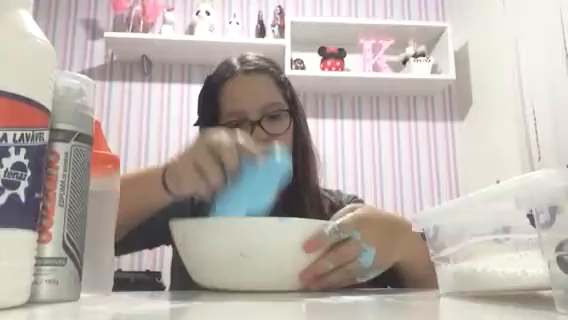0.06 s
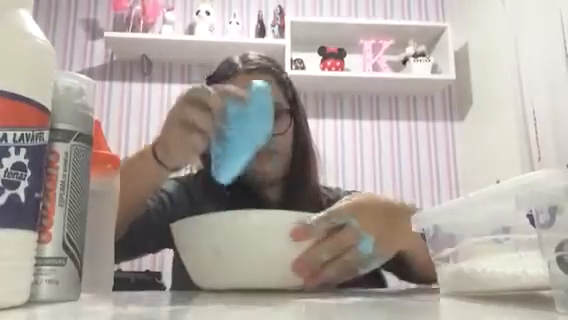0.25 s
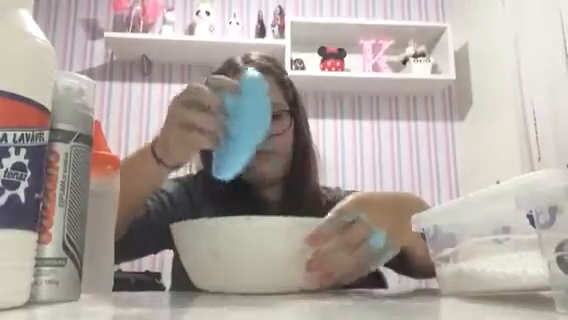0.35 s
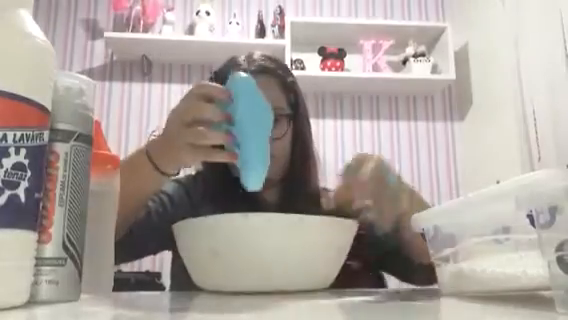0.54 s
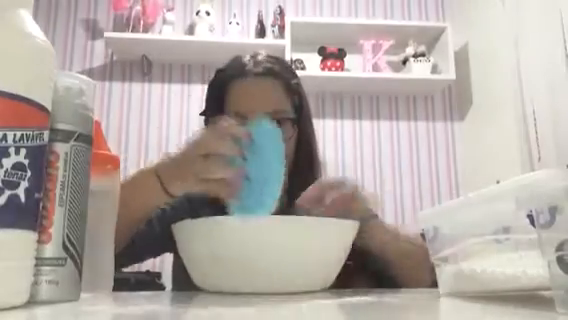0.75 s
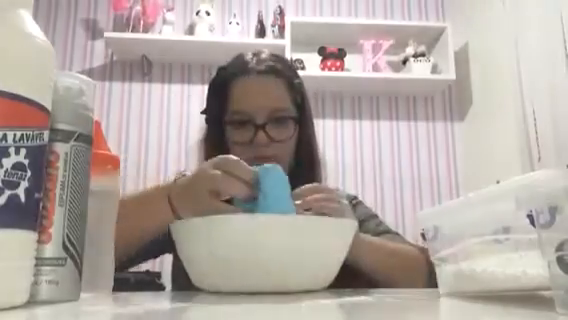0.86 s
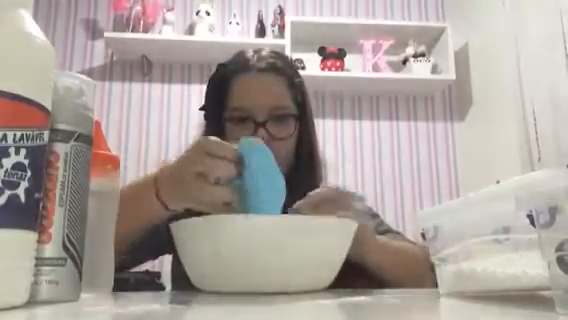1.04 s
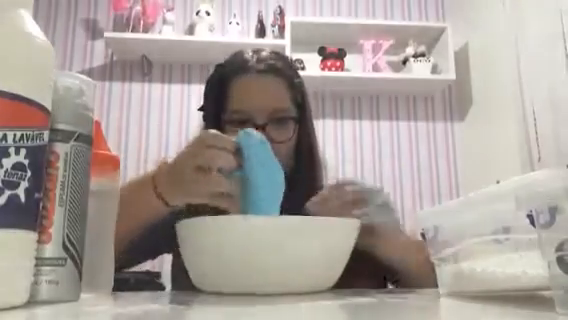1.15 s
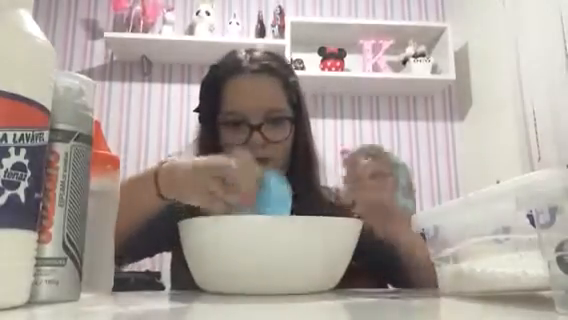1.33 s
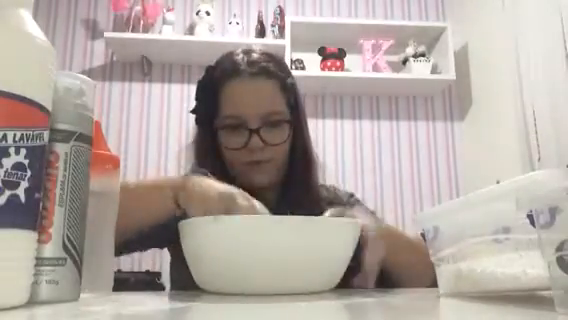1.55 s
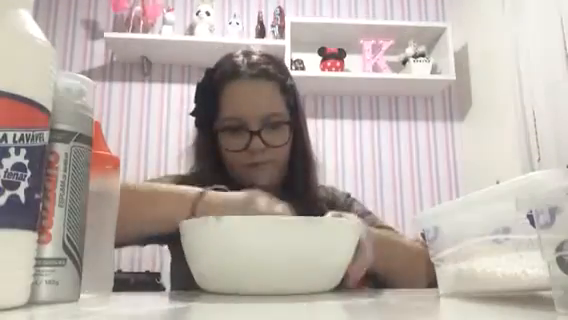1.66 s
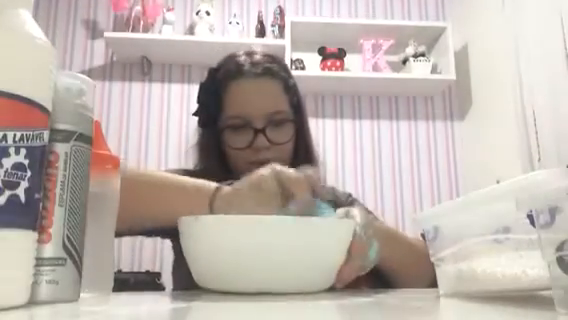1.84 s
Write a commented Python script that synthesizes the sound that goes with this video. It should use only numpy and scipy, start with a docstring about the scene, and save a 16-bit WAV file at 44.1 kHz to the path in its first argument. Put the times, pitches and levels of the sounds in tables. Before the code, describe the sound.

Sticky slime smacks and pops dully as hands pull it from a plastic bowl indoors

```python
"""Dull wet smacks, short hollow pops and low thumps: sticky slime pulled from a plastic bowl and pressed back.
Each smack is a filtered click with a burst of snaps; pops and thumps are short decaying sines.
The click also rings bowl and table modes; rubbing, a squelch and deep table bumps join in a small room.
Underneath: shaped room noise, hiss pulsing at the mains rate and a thin whine gated once a cycle."""
import sys
import numpy as np
from scipy import signal
from scipy.fft import rfft, irfft
from scipy.io import wavfile
from scipy.ndimage import uniform_filter1d

SR = 44100
rng = np.random.default_rng(int(sys.argv[2]) if len(sys.argv) > 2 else 0)


def persist_wave(psi):
    """Save psi, clipped to +-1, as 16-bit WAV."""
    counts = np.round(np.clip(psi, -1, 1) * 32767).astype(np.int16)
    wavfile.write(sys.argv[1], SR, np.atleast_2d(counts).T)


N = 83790
TIME = np.arange(N) / SR
MAINS_HZ = 60


def amp(db):
    """Decibels to linear gain."""
    return 10 ** (np.asarray(db) / 20)


def unit(x):
    """Scales to rms 1."""
    return x / np.sqrt(np.mean(x ** 2) + 1e-20)


def read(points, hz):
    """Interpolates a frequency table on a log-frequency axis."""
    f, value = np.transpose(points)
    return np.interp(np.log(hz + 1), np.log(f + 1), value)


def add(mix, start_s, sound):
    """Adds a sound into mix, in place, from start_s."""
    part = mix[max(round(start_s * SR), 0):][:len(sound)]
    part += sound[:len(part)]


def colour(x, points, lag_s=0, lag_hz=609, size=8192):
    """Minimum-phase filter; lag_s delays the bass, as bending waves do, fading out with scale lag_hz."""
    hz = abs(np.fft.fftfreq(size, 1 / SR))
    log_gain = np.log(amp(read(points, hz)))
    response = np.exp(np.conj(signal.hilbert(log_gain)))[:size // 2 + 1]
    delay_s = lag_s * np.exp(-hz[:size // 2 + 1] / lag_hz)
    # phase is the integral of group delay over frequency
    phase = 2 * np.pi * (np.cumsum(delay_s) - delay_s[0]) * SR / size
    taps = irfft(response * np.exp(-1j * phase))
    return signal.fftconvolve(x, taps[:size // 2])[:len(x)]


def soft_onset(t, rise_s):
    """Smooth rise from 0 towards 1."""
    return 1 - np.exp(-(t / rise_s) ** 2)


def ring(t, hz, t60_s, rise_s):
    """Damped mode: a sine with a soft onset, then exponential decay."""
    decay = amp(-60 * np.maximum(t - rise_s, 0) / t60_s)
    return soft_onset(t, rise_s) * decay * np.sin(2 * np.pi * hz * t)


def crackle(snaps_per_s=3300, spread_db=3):
    """Dense random snaps of either sign, with exponentially spread levels."""
    size = amp(spread_db * np.minimum(rng.exponential(1, N), 4))
    return size * rng.choice([-1, 1], N) * (rng.random(N) < snaps_per_s / SR)


def room_noise():
    """Steady Gaussian noise shaped in the spectrum."""
    # room noise colour: f/Hz, relative level/dB
    floor_colour = [(20, -12), (45, -2.5), (80, 7.5), (170, 1.5), (330, -2.5), (600, -5), (1040, -7.5),
                    (1600, -12), (2100, -28), (4000, -27), (5500, -28), (8000, -67)]
    hz = np.fft.rfftfreq(N, 1 / SR)
    spectrum = rfft(rng.standard_normal(N)) * amp(read(floor_colour, hz))
    return amp(-64) * unit(irfft(spectrum, N))


def mains_buzz():
    """A decaying spit of hiss every mains cycle, over a weaker steady hiss, wavering in level."""
    # buzz colour: f/Hz, relative level/dB
    buzz_colour = [(2000, -28), (3700, -11), (5000, -25), (6200, -5.5), (7000, 0), (7600, -3.5), (8500, -4),
                   (10000, 5), (11400, -4.5), (12300, -34.5), (13700, -26), (14600, -8), (16000, -11.5)]
    spit_at_s, fade_s, steady_part = 0.0085, 0.0022, 0.2
    waver_db, waver_s = 2.5, 0.0088  # rms depth, smoothing time
    spit = steady_part + np.exp(-((TIME - spit_at_s) % (1 / MAINS_HZ)) / fade_s)
    smoothing = [1, -np.exp(-1 / (waver_s * SR))]
    waver = unit(signal.lfilter([1], smoothing, rng.standard_normal(N)))
    hiss = spit * amp(waver_db * waver) * rng.standard_normal(N)
    return amp(-67.5) * unit(colour(hiss, buzz_colour))


def whine():
    """A high sine broadened by random phase drift and gated off once per mains cycle."""
    tone_hz, width_hz = 15535, 24
    gate_at_s, duty = 0.01, 0.78
    is_on = (TIME - gate_at_s) * MAINS_HZ % 1 < duty
    gate = uniform_filter1d(1. * is_on, size=40)  # softened edges
    drift = np.cumsum(rng.standard_normal(N)) * np.sqrt(2 * np.pi * width_hz / SR)
    return amp(-63.5) * unit(gate * np.sin(2 * np.pi * tone_hz * TIME + drift))


def background():
    """Sum of room noise, mains buzz and whine."""
    return room_noise() + mains_buzz() + whine()


def room(x):
    """Direct sound plus discrete reflections, two standing waves and a diffuse tail."""
    # near reflections: delay/s, gain
    echoes = [(.0045, 0.13), (0.0181, 0.15), (0.0233, -0.056), (.031, .1)]
    # decay of the diffuse tail: f/Hz, t60/s
    tail_t60 = [(60, 0.31), (150, .25), (300, 0.3), (550, 0.14), (1000, 0.24), (2500, 0.36), (6000, 0.25)]
    # tail colour: f/Hz, relative level/dB
    tail_colour = [(60, 10.5), (290, -10), (500, -1), (1000, -2), (2500, -10.5), (5000, -33)]
    # standing waves: f/Hz, approximate gain at resonance/dB, t60/s
    standing_waves = [(140, -0.5, 0.4), (220, -0.5, 0.2)]
    tail_db, onset_s = -6.5, 0.011
    t = np.arange(SR // 2) / SR
    hz, frame_s, bins = signal.stft(rng.standard_normal(len(t)), SR, nperseg=256)
    decay = amp(-60 * frame_s / read(tail_t60, hz)[:, None])
    tail = signal.istft(bins * decay, SR, nperseg=256)[1][:len(t)]
    tail = tail * soft_onset(t, onset_s)
    response = amp(tail_db) * colour(tail / np.linalg.norm(tail), tail_colour)
    for delay_s, gain in echoes:
        add(response, delay_s, np.array([gain]))
    for mode_hz, db, t60_s in standing_waves:
        resonance_scale = 2 * np.log(1000) / (t60_s * SR)  # unit gain at resonance
        response = response + amp(db) * resonance_scale * ring(t, mode_hz, t60_s, onset_s)
    return x + signal.fftconvolve(x, response)[:N]


def bumps():
    """The bowl nudges the table: soft, deep, heavily damped tones."""
    # nudges: t/s, level/dB
    nudges = [(0.034, -58), (0.281, -50), (0.758, -51), (0.942, -41), (1.296, -54)]
    out = np.zeros(N)
    for start_s, db in nudges:
        add(out, start_s, amp(db) * ring(TIME, hz=62, t60_s=0.017, rise_s=0.0038))
    return out


def rubbing():
    """Sticky fingers shift on slime and bowl: coloured crackle under a level curve."""
    # rubbing strength: t/s, level/dB
    strength = [(0, -59.5), (.15, -62.5), (.195, -66), (.218, -27.5), (.24, -43.5), (.335, -57.5),
                (.42, -53.5), (.52, -55), (.6, -77), (.68, -74), (.7, -50.5), (.78, -63), (.93, -59.5),
                (1.1, -65), (1.33, -62), (1.45, -68), (1.64, -69), (1.75, -58.5), (1.9, -61.5)]
    # rubbing colour: f/Hz, relative level/dB
    rub_colour = [(25, -71.5), (70, -7), (220, 9.5), (500, -3), (950, -6), (1400, -19), (2200, -22),
                  (3200, -36), (6000, -36)]
    level_db = np.interp(TIME, *np.transpose(strength))
    return amp(level_db) * unit(colour(crackle(), rub_colour))


def squelch():
    """Air crackles out from under the settling lump: rise, hold, exponential fade."""
    # squelch colour: f/Hz, relative level/dB
    squelch_colour = [(60, -19), (300, 8.5), (600, -0.5), (950, -7), (1250, -17), (1600, -13.5),
                      (2250, -18), (2650, -41), (3800, -34), (5500, -47)]
    start_s, rise_s, hold_s, fade_s = 1.148, 0.026, 0.073, 0.025
    t = TIME - start_s
    fade = np.exp(-np.maximum(t - rise_s - hold_s, 0) / fade_s)
    press = np.clip(t / rise_s, 0, 1) * fade
    return amp(-44.5) * press * unit(colour(crackle(), squelch_colour))


def bowl_ring(blows):
    """Bowl and table modes excited by the smack impulses."""
    # modes: f/Hz, relative level/dB, t60/s
    modes = [(221.4, -10, 0.12), (276.6, -11.5, 0.16), (339, 5, 0.074), (402.7, -1.5, .16),
             (468, -10.5, 0.14), (526.6, 5.5, 0.07), (600, -9, 0.14), (720, -39, 0.05), (892, -15, 0.045),
             (1134, -33.5, 0.054), (1192, -27.5, .08), (1625, -23, 0.087)]
    t = np.arange(SR // 2) / SR
    response = sum(amp(db) * ring(t, hz, t60_s, 1 / hz) for hz, db, t60_s in modes)
    return amp(-18.5) * signal.fftconvolve(blows, response)[:N]


def pop(t, hz, rise_s, length_s):
    """An air pocket sounds for a few cycles before the slime chokes it."""
    return soft_onset(t, rise_s) * np.exp(-(t / length_s) ** 2) * np.sin(2 * np.pi * hz * t)


def cling(t, decay_s=0.0063, snaps_per_s=2100):
    """Tiny random snaps dying away after a smack, scaled to unit energy."""
    is_snap = rng.random(len(t)) < snaps_per_s / SR
    snaps = rng.standard_normal(len(t)) * is_snap * np.exp(-t / decay_s)
    return snaps / (np.linalg.norm(snaps) + 1e-9)


def contacts():
    """Wet contacts: each smacks, clings, pops and thumps; its impulse rings the bowl."""
    # contacts: t/s, relative smack level/dB, relative snaps level/dB, pop level/dB, pop f/Hz,
    # pop rise/s, pop length/s, thump level/dB
    contact_events = [(.039, -49.5, -45.5, -48, 609, .004, 0.0091, -66),
                      (0.2212, 0, -3.5, -8, 254, 0.0028, .011, -23),
                      (0.299, -26.5, -30.5, -37, 232, 0.0023, .01, -41),
                      (0.363, -35.5, -33, -50, 294, 0.0036, 0.0085, -65),
                      (.438, -30, -38.5, -30.5, 268, 0.0017, 0.0099, -36.5),
                      (.471, -32, -29, -29.5, 316, 0.003, 0.014, -31),
                      (0.7, -13.5, -15, -16.5, 257.4, 0.0044, 0.0099, -59),
                      (0.724, -26, -28.5, -33, 253, 0.0033, 0.014, -35),
                      (0.826, -40, -28.5, -26, 292, 0.0052, 0.017, -36.5),
                      (0.916, -46, -49, -34.5, 202, 0.0015, 0.0078, -46),
                      (.943, -44, -37, -43, 310, 0.0032, .01, -70),
                      (1.0258, -32, -29.5, -22, 287.5, 0.0049, 0.017, -37),
                      (1.053, -37, -32, -31.5, 230.4, 0.0044, 0.013, -54),
                      (1.223, -20, -25, -13.5, 264, 0.0085, 0.013, -27),
                      (1.24, -33, -20.5, -26, 383, 0.0078, 0.019, -34),
                      (1.261, -22.5, -34, -27.5, 235.5, 0.0036, 0.017, -51),
                      (1.296, -52, -40, -35.5, 225, 0.01, 0.016, -43),
                      (1.658, -70, -66, -53, 205, 0.006, .015, -35.5),
                      (1.721, -38.5, -27.5, -28, 270, 0.0075, 0.0082, -39),
                      (1.755, -64, -56.5, -47, 195, 0.006, 0.007, -63)]
    # smack colour: f/Hz, relative level/dB
    smack_colour = [(30, -14), (90, -16.5), (200, -17), (520, 4.5), (660, -5.5), (890, -3), (1020, -8.5),
                    (1170, -11.5), (1350, -27), (1600, -16), (2000, -32.5), (2300, -32.5), (2800, -50),
                    (4200, -55), (5500, -59)]
    t = np.arange(SR // 2) / SR
    blows, snaps, hollow = np.zeros((3, N))
    for start_s, smack_db, snaps_db, pop_db, pop_hz, pop_rise_s, pop_length_s, thump_db in contact_events:
        add(blows, start_s, amp([smack_db]))
        add(snaps, start_s, amp(snaps_db) * cling(t))
        add(hollow, start_s, amp(pop_db) * pop(t, pop_hz, pop_rise_s, pop_length_s))
        add(hollow, start_s, amp(thump_db) * ring(t, hz=134, t60_s=0.1, rise_s=0.01))
    smacks = amp(24) * colour(blows + snaps, smack_colour, lag_s=0.00395)
    return smacks + bowl_ring(blows) + hollow


def scene():
    """Slime, bowl and table sounds, low-passed to a dull treble, in the room over the background."""
    low_pass = signal.butter(8, 4170, fs=SR, output="sos")  # cutoff/Hz
    dull = signal.sosfilt(low_pass, contacts() + bumps() + squelch() + rubbing())
    return (room(dull) + background())[None]


def record(dry):
    """Band limit of the recorder: a steep linear-phase low-pass."""
    edge_hz = 15950
    taps = signal.firwin(511, edge_hz, window=("kaiser", 9), fs=SR)
    return signal.oaconvolve(dry, taps[None], "same")


dry = scene()
out = record(dry)
persist_wave(out)
```